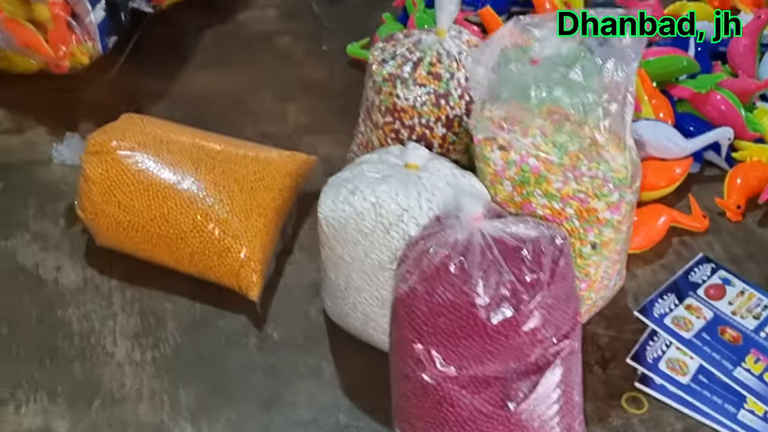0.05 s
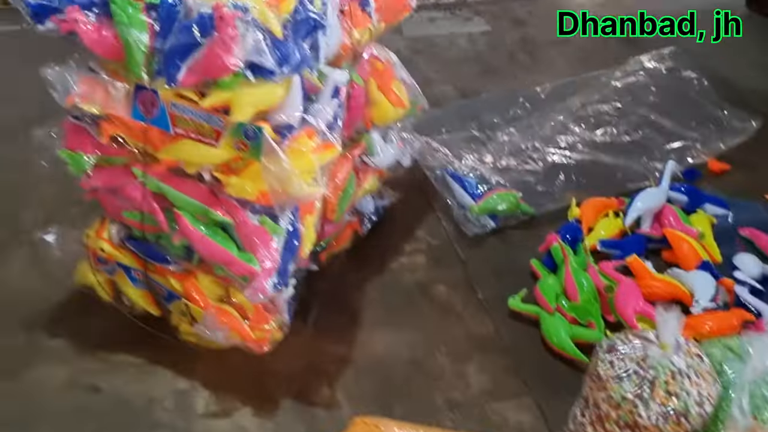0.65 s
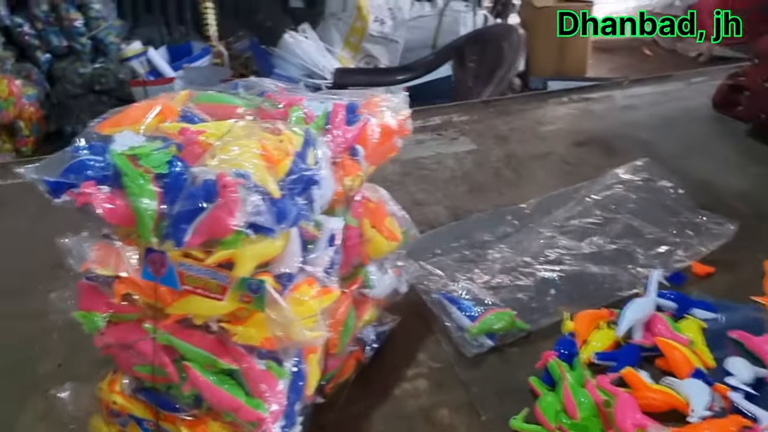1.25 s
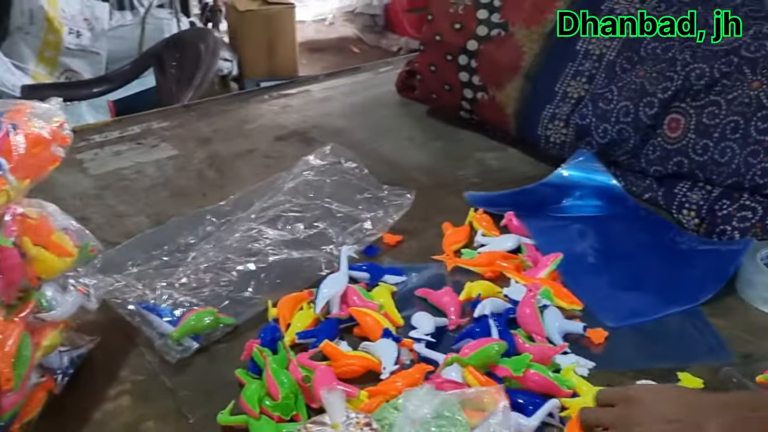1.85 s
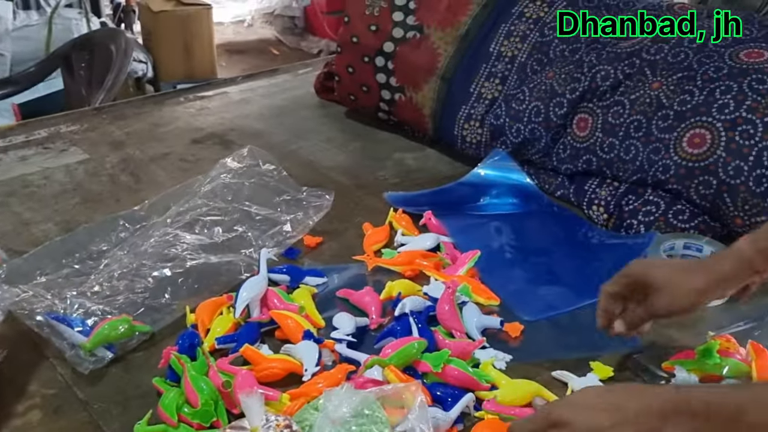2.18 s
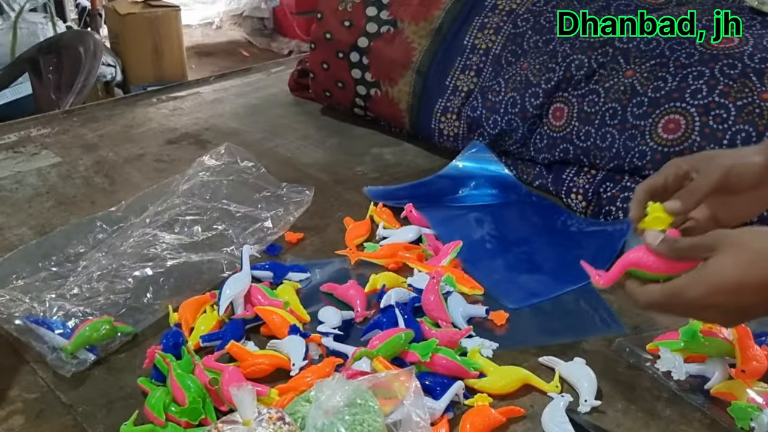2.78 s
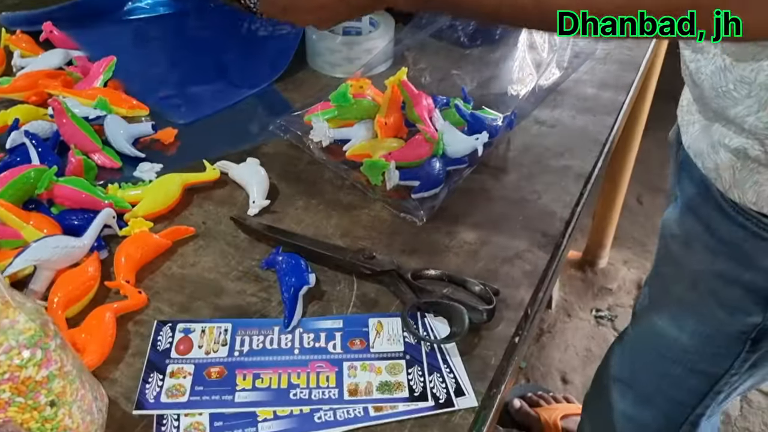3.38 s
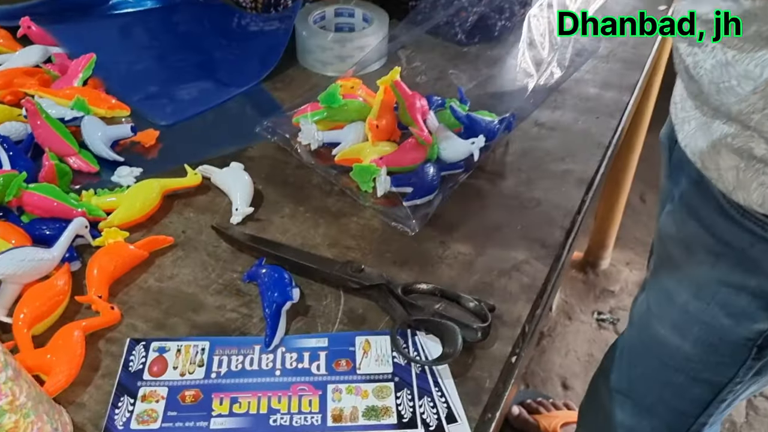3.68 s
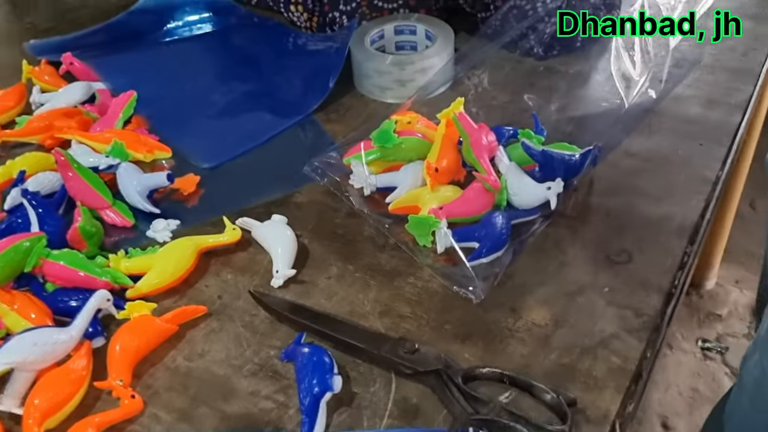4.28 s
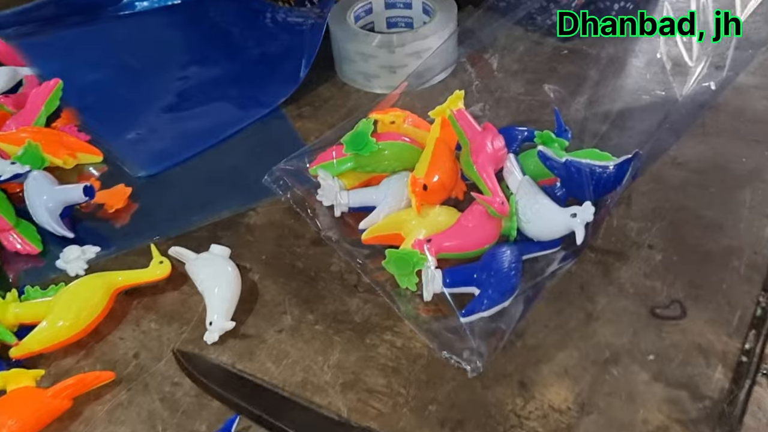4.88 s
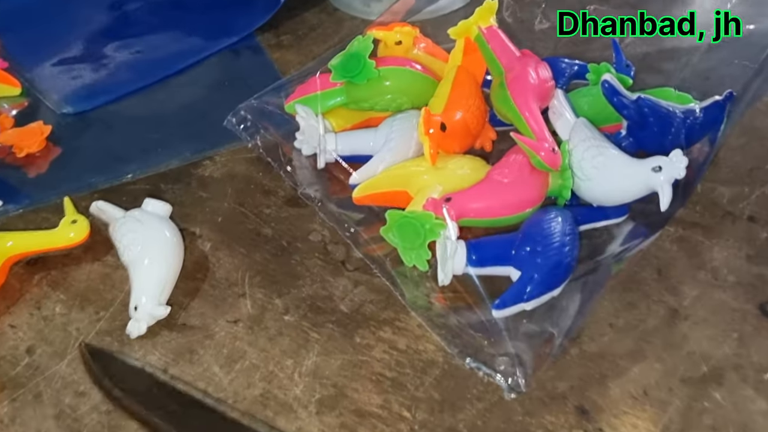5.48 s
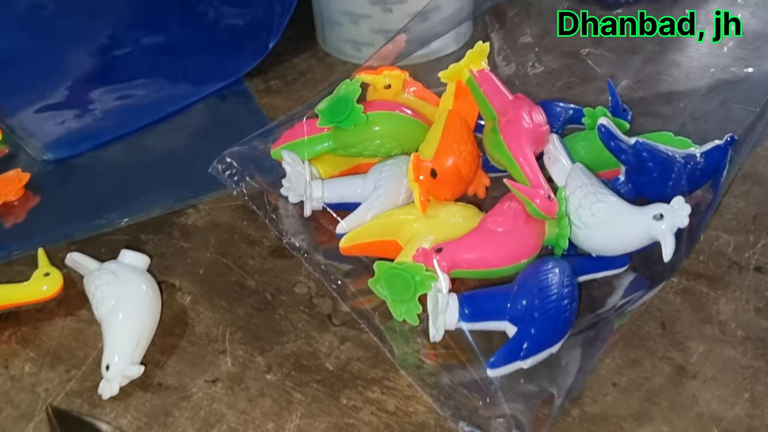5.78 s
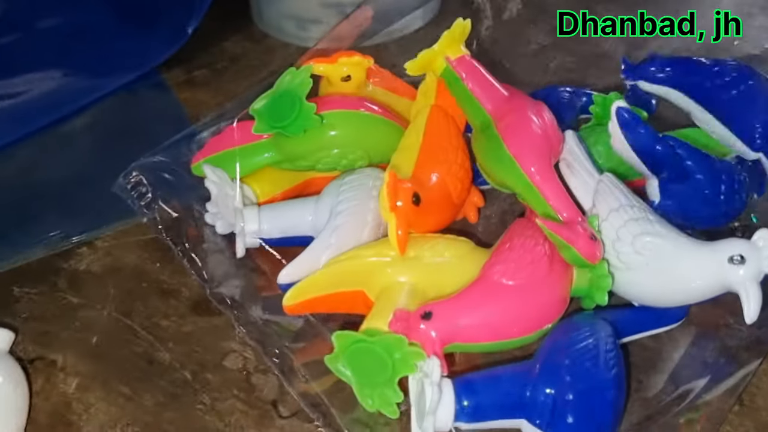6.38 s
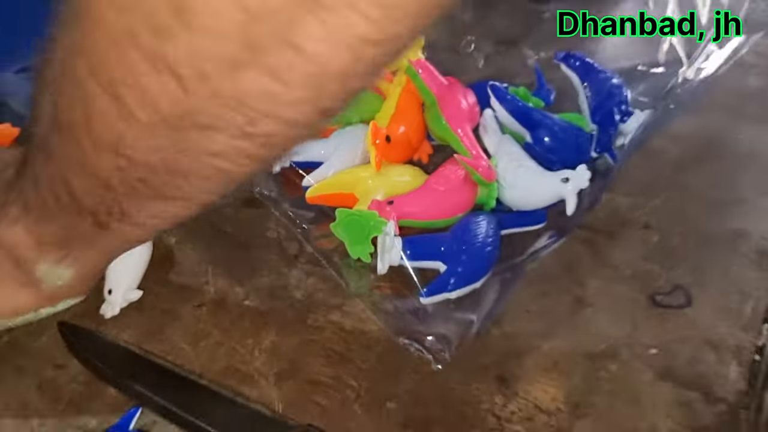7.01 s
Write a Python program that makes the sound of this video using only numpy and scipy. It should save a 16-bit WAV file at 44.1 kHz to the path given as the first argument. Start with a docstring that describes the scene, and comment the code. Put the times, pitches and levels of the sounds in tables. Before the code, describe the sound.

Hollow plastic toys knock and clack on a tabletop amid the crinkle of plastic bags, close by in a small room.

```python
"""Packing plastic toys into bags

Hollow toys are packed into thin plastic bags on a table, close to a stereo microphone.
A full bag crinkles as its creases buckle, a hand rummages through the loose toys, light taps follow,
and a toy drops into an open bag with a clatter. Each knock rings the toys' shells and the table top.
A small room echoes, over a low rumble."""
import sys
import numpy as np
from scipy import signal
from scipy.fft import rfft, irfft
from scipy.io import wavfile

SR = 44100
rng = np.random.default_rng(int(sys.argv[2]) if len(sys.argv) > 2 else 0)


def unload_wav(signal):
    """Save mono or channel-first audio to the path in sys.argv[1] as 16-bit WAV at rate SR, clipped to [-1, 1]."""
    wavfile.write(
        sys.argv[1],
        SR,
        np.round(np.clip(np.atleast_2d(signal).T, -1, 1) * 32767).astype(np.int16),
    )


N = 310905

# tone of the bags' thin plastic film: f/Hz, level/dB
FILM_TONE = [(200, -34.5), (900, -8.5), (1500, -7), (2500, -2), (4300, -5), (5800, -1.5), (7900, -7.5),
             (9000, -17.5), (10900, -15), (15000, -9)]
FILM_FADE_DB_PER_S = 255


def amp(db):
    """Turns decibels into a gain."""
    return 10 ** (np.asarray(db) / 20)


def unit_rms(x):
    """Scales a signal to an average (rms) level of one."""
    return x / np.sqrt(np.mean(x ** 2) + 1e-20)


def read(points, hz):
    """Looks up a table of (frequency, value) on a log-frequency axis."""
    f, value = np.transpose(points)
    return np.interp(np.log(hz + 1), np.log(f + 1), value)


def bins(size):
    """The frequencies in a spectrum of this many samples."""
    return np.fft.rfftfreq(size, 1 / SR)


def colour(x, points):
    """Shapes the tone by a table of f/Hz, level/dB."""
    return irfft(rfft(x) * amp(read(points, bins(x.shape[-1]))), x.shape[-1])


def add(mix, s, sound):
    """Mixes a stereo sound in at s seconds."""
    part = mix[:, max(round(s * SR), 0):][:, :sound.shape[1]]
    part += sound[:, :part.shape[1]]


def shortest_pulse(db):
    """The most compact pulse that has this spectrum (minimum phase)."""
    cepstrum = irfft(np.log(amp(db)))
    half = len(cepstrum) // 2
    cepstrum[1:half] *= 2
    cepstrum[half + 1:] = 0
    return irfft(np.exp(rfft(cepstrum)))


def stereo_noise(size, min_likeness=0):
    """White noise whose two sides are alike in the bass and less so in the treble."""
    # how alike left and right are: f/Hz, likeness (0 to 1)
    likeness = [(130, .93), (350, .9), (700, .76), (1400, .05)]
    left, other = rfft(rng.standard_normal((2, size)))
    same = np.clip(read(likeness, bins(size)), min_likeness, 1)
    right = same * left + np.sqrt(1 - same ** 2) * other
    return irfft(np.array([left, right]), size)


def ambience(air_db=-59):
    """A low rumble that eases off, and the faint steady air of the room."""
    # tones of the rumble and the air: f/Hz, level/dB
    rumble_tone = [(20, -26.5), (45, -10), (75, -2), (110, -13.5), (150, -19), (500, -68)]
    air_tone = [(60, -3), (200, -4), (380, -2.5), (650, -14), (1100, -19), (4500, -32.5), (7300, -26),
                (9200, -38), (14000, -30.5)]
    # strength of the rumble: t/s, level/dB
    rumble_levels = [(2.7, -47.5), (3.602, -51.5)]
    rumble_db = np.interp(np.arange(N) / SR, *np.transpose(rumble_levels))
    rumble = amp(rumble_db) * unit_rms(colour(stereo_noise(N), rumble_tone))
    return rumble + amp(air_db) * unit_rms(colour(stereo_noise(N), air_tone))


def hiss_bands():
    """Faint narrow bands of hiss: brief swishes and squeaks, and longer soft background hiss."""
    # bands of hiss: middle t/s, length/s, f/Hz, level/dB, width as a share of f
    bands = [(1.443, 0.5, 2540, -57, 0.18), (2.852, 0.89, 1480, -62.5, 0.42),
             (3.181, 0.14, 3260, -55, 0.14), (3.765, 0.19, 4530, -63, 0.012),
             (4.572, 0.61, 1930, -73, 0.05), (4.989, 0.17, 2160, -51, 0.089),
             (5.384, 0.47, 1880, -69.5, 0.079)]
    out = np.zeros((2, N))
    for s, length, hz, db, width in bands:
        size = int(length * SR)
        band = 1 / (1 + ((bins(size) / hz - 1) / width) ** 2)
        hiss = unit_rms(irfft(rfft(stereo_noise(size)) * band, size))
        add(out, s - length / 2, amp(db) * hiss * np.hanning(size))
    return out


def room(x, near_db, near_t60, far_db):
    """Quick echoes off the table and the things on it, then the longer echo of the room."""
    # how long the room rings: f/Hz, t60/s (the time to fade by 60 dB)
    room_t60 = [(200, 0.93), (2000, 0.56), (10000, 0.34)]
    hz, t, spectra = signal.stft(stereo_noise(SR), SR, nperseg=256)
    fade = amp(-60 * t / read(room_t60, hz)[:, None])
    far = signal.istft(spectra * fade, SR, nperseg=256)[1][:, :SR]
    t = np.arange(SR) / SR
    near = stereo_noise(SR) * amp(-60 * t / near_t60)
    arrival = np.clip(t / 0.0031 - 1, 0, 1)  # echoes come after the direct sound
    response = amp(near_db) * unit_rms(near * arrival) + amp(far_db) * unit_rms(far * arrival)
    return signal.fftconvolve(x, response / np.sqrt(SR), axes=1)[:, :N]


def drift(x):
    """The handling shifts between left and right, and its top treble brightens and dulls."""
    # balance and brightness over time: t/s, left minus right/dB, top treble/dB
    shifts = [(0.2, -3, -3.5), (0.9, -1, 0.5), (1.6, -0.4, 1.5), (4.8, 0, 1.5), (6.0, -1.5, 6),
              (6.15, -1, 1.5), (6.85, 0.5, -1)]
    s, balance_db, treble_db = np.transpose(shifts)
    t = np.arange(N) / SR
    top = colour(x, [(7500, -40), (9000, 0)])
    heard = x + top * (amp(np.interp(t, s, treble_db)) - 1)
    return heard * amp(np.interp(t, s, balance_db) * np.array([[1], [-1]]) / 2)


def fits_and_starts(depth_db, per_s):
    """Plastic catches and gives way, so its level flickers at random."""
    t = np.arange(N) / SR
    steps = rng.standard_normal(2048)
    return amp(depth_db * np.interp(t * per_s, np.arange(len(steps)), steps))


def effort(moves, fade_db_per_s, rise_share=0.3, sag_db=-4.5, settle_db=-9, settle_db_per_s=76.5):
    """Gain over time: each hand move builds up, weakens and dies away as the plastic settles."""
    clock = np.arange(0, N / SR, .001)
    start, length, db = np.transpose(moves)[:, :, None]
    t = clock - start
    rise = np.clip(t / (rise_share * length), 0, 1)
    hold = amp(db + sag_db * np.clip(t / length, 0, 1))
    after = np.maximum(t - length, 0)
    fade = np.hypot(amp(-fade_db_per_s * after), amp(settle_db - settle_db_per_s * after))
    return np.interp(np.arange(N) / SR, clock, np.linalg.norm(rise * hold * fade, axis=0))


def slides():
    """Film glides without creasing: a smooth, soft hiss."""
    # glides: start t/s, length/s, level/dB
    glides = [(2.41, 0.042, -47), (3.11, 0.28, -51), (3.66, 0.25, -59), (3.92, 0.66, -63),
              (4.65, 0.35, -51.5), (4.88, 0.5, -60)]
    hiss = unit_rms(colour(stereo_noise(N), FILM_TONE))
    return effort(glides, FILM_FADE_DB_PER_S) * hiss * fits_and_starts(depth_db=2.0, per_s=30)


def burst(decay_s, size):
    """A dying cluster of tiny contacts and their echoes."""
    noise = stereo_noise(size, min_likeness=0.29) * np.exp(-np.arange(size) / SR / decay_s)
    return unit_rms(noise) / np.sqrt(size)


def facet(x, low_hz, high_hz, peak_db, width=0.04):
    """One small patch of plastic rings briefly, at a random pitch."""
    size = x.shape[1]
    pitch = low_hz * (high_hz / low_hz) ** rng.random()
    resonance = amp(peak_db) / (1 + 1j * (bins(size) / pitch - 1) / width)
    return irfft(rfft(x) * (1 + resonance), size)


def grains(gain, tone, per_s, spread_db, decay_s, low_hz, high_hz, peak_db, count=32):
    """Tiny random clicks, most weak and a few strong, louder and denser the harder the hands work."""
    shapes = [unit_rms(facet(burst(decay_s, 512), low_hz, high_hz, peak_db)) for _ in range(count)]
    strengths = amp(spread_db * np.minimum(rng.exponential(1, N), 3.5))
    kind = rng.integers(0, count, N)
    density = np.maximum(gain / gain.max(), .01) ** 0.35  # only the hardest move reaches per_s
    stream = np.zeros((2, N))
    for at in np.flatnonzero(rng.random(N) < density * per_s / SR):
        add(stream, at / SR, strengths[at] / np.sqrt(density[at]) * shapes[kind[at]])
    return unit_rms(colour(stream, tone)) * gain


def rummaging(level_db=-1):
    """Each move of the hands crumples the film (a bright crinkle) and shifts the toys (a dull shuffle)."""
    # hand moves: start t/s, length/s, film level/dB, toy level/dB
    moves = [(0.0, 0.031, -32.5, -34.5), (0.133, 0.16, -33, -37), (0.224, 0.11, -31, -38.5),
             (0.323, 0.11, -36.5, -45.5), (0.449, 0.11, -34.5, -40.5), (0.632, 0.079, -35, -40),
             (0.713, 0.098, -33.5, -35), (0.884, 0.098, -37, -35), (0.971, 0.21, -48.5, -56),
             (1.255, 0.051, -42.5, -49), (1.549, 0.032, -39, -33.5), (1.729, 0.18, -39.5, -35.5),
             (1.938, 0.085, -46.5, -38), (2.007, 0.27, -62.5, -42), (2.217, 0.12, -49, -42),
             (2.392, 0.1, -60.5, -46.5), (5.962, 0.052, -31.5, -30), (6.13, 0.055, -40.5, -31),
             (6.31, 0.093, -106, -45.5), (6.817, 0.055, -42.5, -43), (6.9, 0.097, -79, -57)]
    # tone of the shifting toys: f/Hz, level/dB
    pile_tone = [(90, -4), (370, 0.5), (500, -5.5), (680, -2), (950, -6), (1350, -10.5), (2000, -12.5),
                 (3500, -24), (9000, -34.5)]
    crumpling = effort([(s, length, db) for s, length, db, _ in moves], FILM_FADE_DB_PER_S)
    shuffling = effort([(s, length, db) for s, length, _, db in moves], fade_db_per_s=329)
    crinkle = grains(crumpling, FILM_TONE, per_s=800, spread_db=2.0, decay_s=0.0042,
                     low_hz=1734, high_hz=9540, peak_db=13.5)
    shuffle = grains(shuffling, pile_tone, per_s=650, spread_db=3.0, decay_s=0.0041,
                     low_hz=321, high_hz=1490, peak_db=1)
    return amp(level_db) * (crinkle * fits_and_starts(depth_db=0.5, per_s=60) + shuffle)


def click(bass_db, middle_db, treble_db, chatter_db, chatter_s, size=8192):
    """One sharp contact, followed by a chatter of tiny ones."""
    # tone common to all contacts: f/Hz, level/dB
    contact_tone = [(40, -20.5), (110, -6), (300, 0), (8100, -1), (9300, -19), (11000, -16), (15000, -12)]
    hz = bins(size)
    own_tone = [(680, bass_db), (1250, middle_db), (3400, middle_db), (4800, treble_db)]
    pulse = shortest_pulse(read(own_tone, hz) + read(contact_tone, hz))
    contact = amp(chatter_db) * burst(chatter_s, size)
    contact[:, 0] += 1  # the first touch
    contact /= np.sqrt(np.sum(contact ** 2) / 2)
    return signal.fftconvolve(contact, pulse[None], axes=1)


def snaps(level_db=-4.0, bass_db=-5):
    """Creases in the bag buckle: bright cracks with little body and a brief ring."""
    # buckling creases: t/s, middle level/dB, treble level/dB
    creases = [(0.0083, 6, 7.5), (0.1292, 4, 0), (0.1781, 6, 0.5), (0.2066, 5.5, -12), (0.239, -3, -11),
               (0.32, 4.5, -5), (0.3618, 2, -17), (0.468, -6, -1), (0.4825, -2, -17), (0.4915, 0.5, -18),
               (0.6709, 0, 13.5), (0.7892, 3, 1), (1.029, -4.5, -8), (1.235, -8.5, -16.5), (1.558, -5, -4),
               (3.0941, -11, -7), (3.3512, -5.5, -7), (3.925, -11.5, -15.5), (3.952, -7.5, -16.5),
               (4.3715, -18, -15), (4.848, -17, -8), (5.9662, -10, -1), (5.976, 3, 5), (5.985, 1.5, 10.5),
               (6.271, -9, -8), (6.977, -10.5, -17)]
    out = np.zeros((2, N))
    for s, db, treble_db in creases:
        crack = click(db + bass_db, db, treble_db, chatter_db=18, chatter_s=0.0036, size=2048)
        add(out, s, facet(crack, low_hz=2207, high_hz=3186, peak_db=1.5))
    return amp(level_db) * out


def ring(blow, own_hz, own_db, own_cycles, shell_db):
    """A blow rings the toy's own hollow, the shell notes that all toys share, and the table top."""
    # notes of the shells and boom of the table top: f/Hz, level/dB, t60/s
    shell_notes = [(1230, -0.5, 0.04), (3900, -12.5, 0.017)]
    table_notes = [(86.7, 20, 0.24), (131, -7, 0.23), (250.5, -8, 0.097)]
    t = np.arange(blow.shape[1]) / SR
    shell = [(hz, db + shell_db, t60) for hz, db, t60 in shell_notes]
    notes = [(own_hz, own_db, own_cycles / own_hz)] + shell + list(table_notes)
    body = np.zeros(len(t))
    for hz, db, t60 in notes:
        scale = 2 * np.log(1000) / (t60 * SR)  # makes db the gain at the note's pitch
        body += scale * amp(db - 60 * t / t60) * np.cos(2 * np.pi * hz * t)
    return blow + signal.fftconvolve(blow, body[None], axes=1)[:, :len(t)]


def thuds():
    """Toys are set down on the table with low, hollow thuds."""
    # landings: t/s, level/dB, treble relative to level/dB, the toy's own ring f/Hz
    landings = [(0.9029, 1, -3, 420), (0.9577, 8.5, -12.5, 780), (1.564, 1.5, -15, 397),
                (1.592, 5, -14.5, 616), (1.7923, 10, -19, 900), (1.8555, 10, -12.5, 700),
                (2.056, 9.5, -22, 520), (2.2333, 6.5, -25, 685), (2.371, 3.5, -24, 515),
                (2.483, -5.5, -26, 554), (2.567, -5, -20.5, 610), (6.0018, 13, -18, 696),
                (6.1103, 18.5, -26.5, 255), (6.2559, 8, -11.5, 570), (6.421, -6.5, -10, 1200),
                (6.83, -0.5, -45, 457)]
    out = np.zeros((2, N))
    for s, db, treble_db, own_hz in landings:
        middle_db = db + 0.61 * treble_db  # a duller thud stirs the shell less
        blow = click(db, middle_db, db + treble_db, chatter_db=-1.0, chatter_s=0.0051)
        add(out, s, ring(blow, own_hz, own_db=5.5, own_cycles=6, shell_db=12.0))
    return out


def clacks(bass_db=-10.5, rattle_hz=1330, rattle_treble_db=-15):
    """Toy strikes toy with a bright clack, and one rocks on the table in a quick rattle."""
    # strikes: t/s, level/dB, treble relative to level/dB, the toy's own ring f/Hz
    strikes = [(0.7577, 4, -5, 2116), (1.829, 0, -22, 1290), (1.9751, 1.5, -14.5, 1320),
               (1.99, -6, -16, 1350), (2, -6, -22, 1350), (2.071, -2, -4, 1330), (2.182, -5, -5, 1680),
               (2.2583, -1, -12, 2830), (2.301, -3.5, -9, 1330), (2.3165, -0.5, -19, 2070),
               (3.384, -9, -6.5, 1420), (5.0913, 3.5, -10, 1760), (5.0938, 1, -13, 3730),
               (5.1768, -8.5, -7.5, 1150), (5.234, -17.5, -3.5, 1110), (6.015, 5.5, 4.5, 3840),
               (6.106, 18, -6.5, 1240), (6.1132, 12, 4, 1250), (6.158, -1, 2, 1450), (6.1785, 2, 3, 1280),
               (6.186, 0, -3, 1220), (6.2549, 5, -4.5, 1380), (6.331, -7.5, -11, 1270),
               (6.3901, -6, -2, 1260), (6.8368, -5.5, 4.5, 2450), (6.845, -2.5, 1, 1440),
               (6.932, -6.5, 5, 1400)]
    # taps of the rocking toy: t/s, level/dB
    rocking = [(2.092, -9), (2.1282, -5), (2.1505, -18), (2.169, -13.5), (2.208, -14)]
    rattle = [(s, db, rattle_treble_db, rattle_hz) for s, db in rocking]
    out = np.zeros((2, N))
    for s, db, treble_db, own_hz in list(strikes) + rattle:
        blow = click(db + bass_db, db, db + treble_db, chatter_db=8.5, chatter_s=0.0021)
        own_db = 4.5 + 0.37 * max(-db, 0)  # a light tap sounds hollower
        shell_db = 0.39 * db  # a heavy clack sets the shells ringing
        add(out, s, ring(blow, own_hz, own_db, own_cycles=15, shell_db=shell_db))
    return out


def scene(knock_db=-2):
    """Hits and rustle in the room; the low notes lean to the left, the treble to the right."""
    # balance of the microphone's two sides: f/Hz, left minus right/dB
    balance = [(300, 1.5), (1300, 2.5), (2400, 0.5), (4400, -1.5), (9000, -2.5)]
    hits = drift(amp(knock_db) * (thuds() + clacks()) + snaps())
    rustle = drift(rummaging()) + slides() + hiss_bands()
    echoes = room(hits, near_db=-6.0, near_t60=0.12, far_db=-20.5)
    echoes += room(rustle, near_db=-8, near_t60=0.06, far_db=-13.5)
    mix = hits + rustle + echoes + ambience()
    tilt = amp(read(balance, bins(N)) / 2)
    return irfft(rfft(mix) * np.array([tilt, 1 / tilt]), N)


def record(dry, ceiling=0.7, cut_off_hz=16100):
    """Rounds off the sharpest peaks, then steeply cuts the highest treble."""
    rounded = ceiling * np.tanh(dry / ceiling)
    low_pass = signal.firwin(301, cut_off_hz, window=("kaiser", 8), fs=SR)
    return signal.oaconvolve(rounded, low_pass[None], "same", axes=1)


dry = scene()
out = record(dry)
unload_wav(out)
```